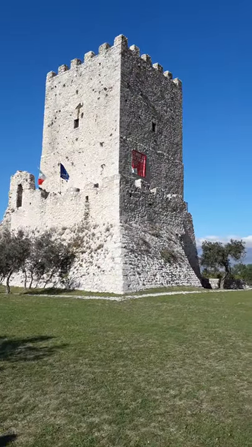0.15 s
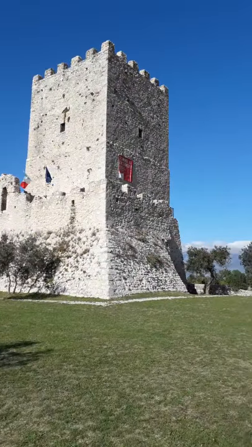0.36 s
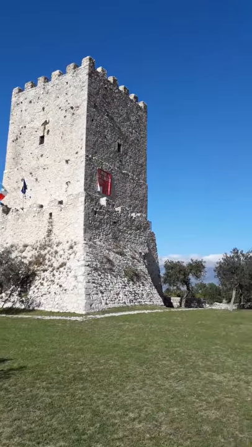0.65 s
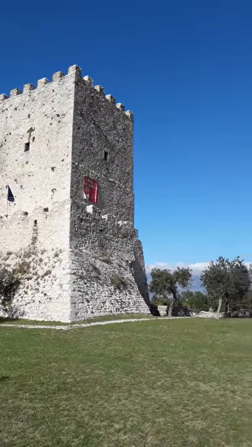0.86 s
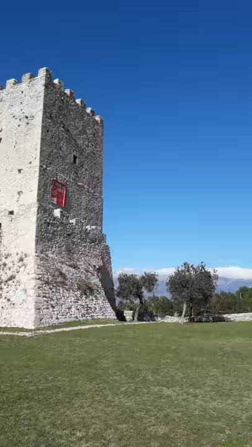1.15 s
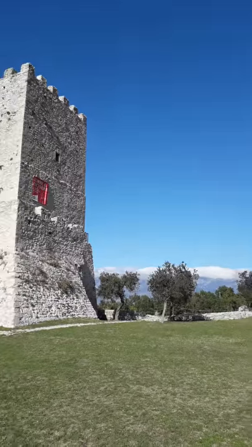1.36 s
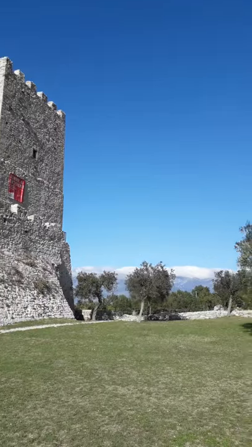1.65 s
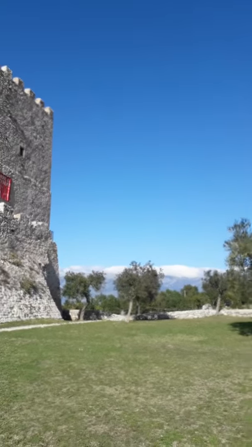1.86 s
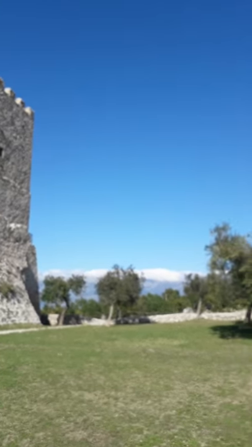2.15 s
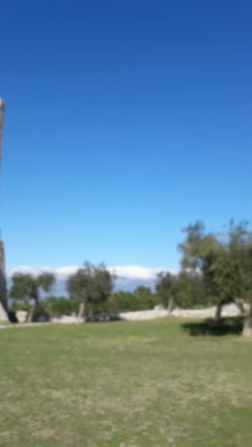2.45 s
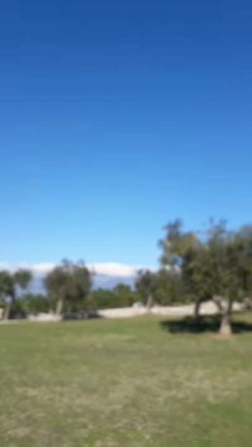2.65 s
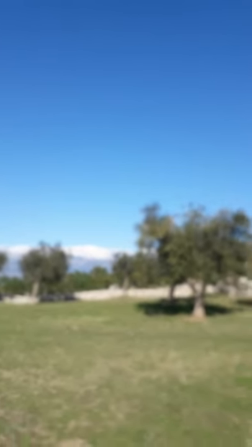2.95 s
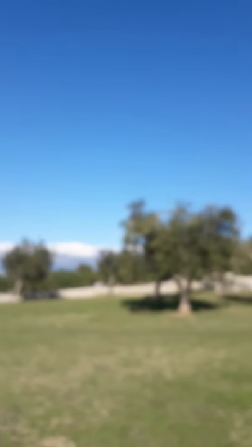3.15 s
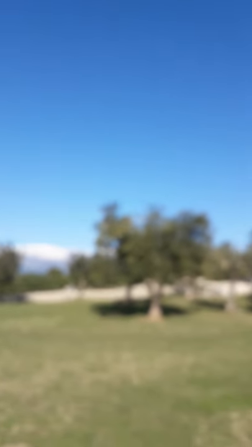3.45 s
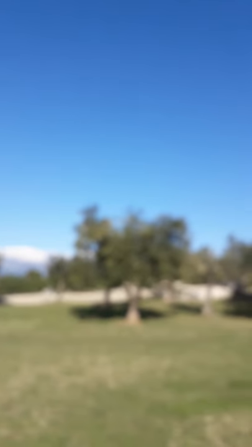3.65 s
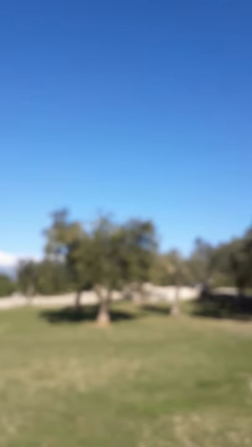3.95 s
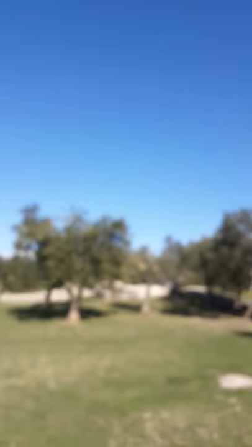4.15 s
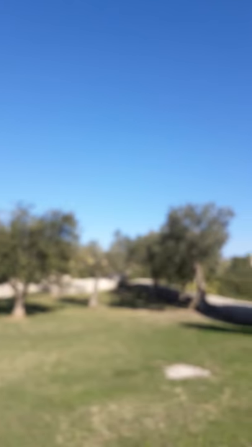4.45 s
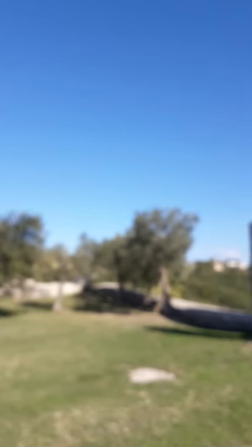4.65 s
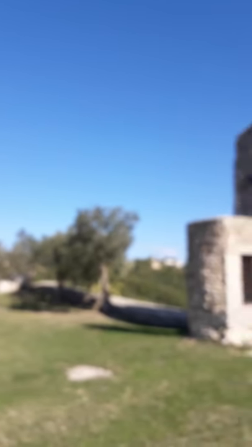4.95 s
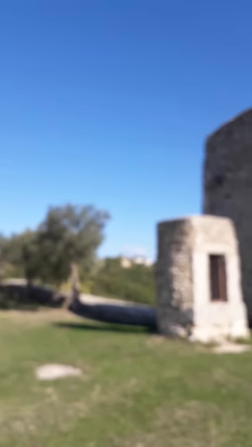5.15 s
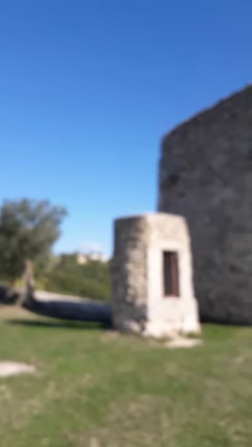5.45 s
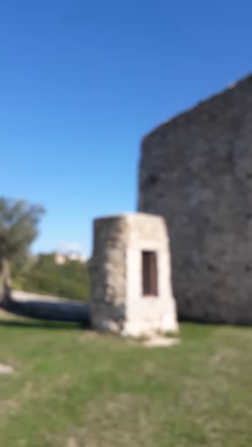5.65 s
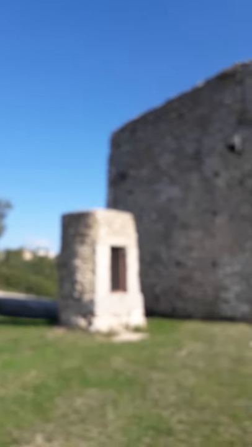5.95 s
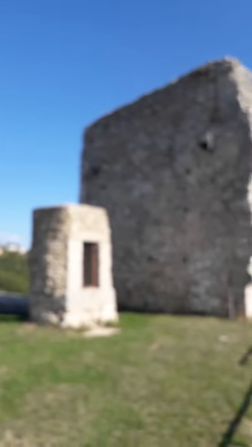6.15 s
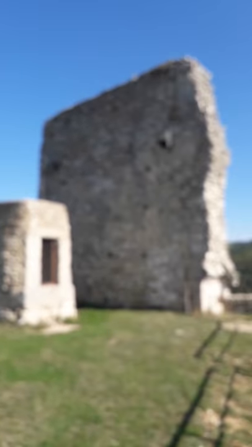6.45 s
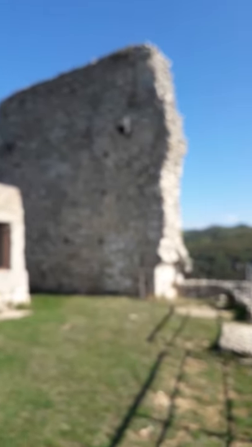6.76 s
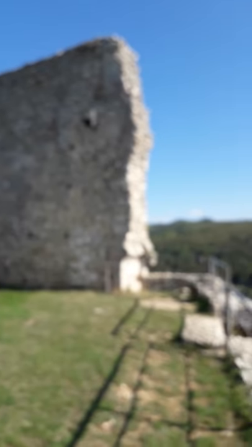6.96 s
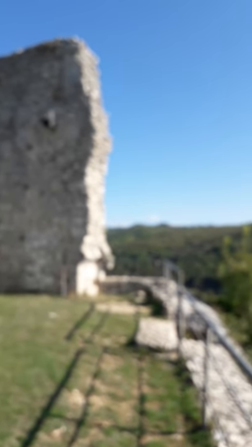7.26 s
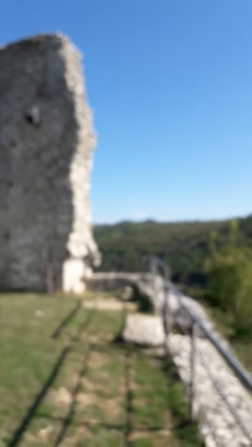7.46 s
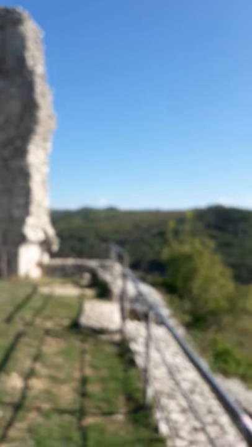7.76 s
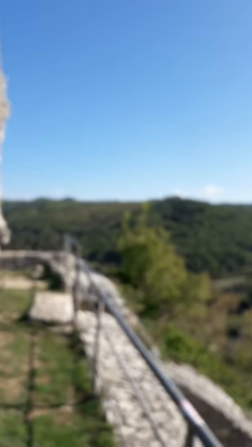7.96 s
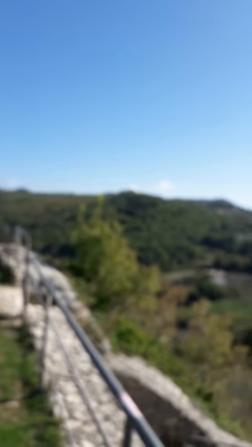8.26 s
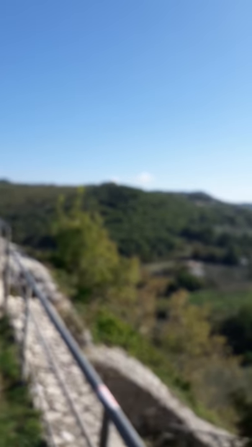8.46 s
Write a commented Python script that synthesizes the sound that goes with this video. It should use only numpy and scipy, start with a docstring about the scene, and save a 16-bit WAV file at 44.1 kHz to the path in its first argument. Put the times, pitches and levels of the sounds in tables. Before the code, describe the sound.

Close, mono wind noise outdoors, with no shelter on the microphone. Irregular buffets thud and snap over a low rumble, fall back, surge heavily near the third second, then settle into softer, muffled flutters. The last third is the roughest, with crackling gusts, hard slaps and short lulls until an abrupt loud finish. Leaves hiss faintly, and a tiny nail tick on the case is almost buried.

```python
"""Rumbling wind and hard, slapping buffets: a gusty open hilltop blows straight onto a hand-held microphone.
Breeze, buffets and gusts set the pressure and speed at which turbulent noise sweeps over the port:
rumble in the lulls, crackle in the gusts, brighter as the air speeds up, caught by a limiter.
Faintly behind, shaped noise makes the trees' hiss, the hand's brushes on the case and one nail tick."""
import sys
import numpy as np
from scipy import signal
from scipy.fft import rfft, irfft, next_fast_len
from scipy.io import wavfile
from scipy.ndimage import uniform_filter1d, minimum_filter1d, map_coordinates

SR = 44100
rng = np.random.default_rng(int(sys.argv[2]) if len(sys.argv) > 2 else 0)


def put_to_file(sound):
    """Save the sound as 16-bit audio at rate SR, in the file named by the first command-line argument."""
    columns = np.atleast_2d(sound).T  # one column per channel
    safe = np.clip(columns, -1, 1)
    whole_steps = np.round(safe * 32767)
    wavfile.write(sys.argv[1], SR, whole_steps.astype(np.int16))


N = 379701
TIME_S = np.arange(N) / SR
JERK_DB = 2.5  # spread of brief jerks in air speed


def undb(db):
    """Decibels to amplitude gain."""
    return 10 ** (np.asarray(db) / 20)


def curve(rows):
    """Rows of (time_s, value) joined by straight lines."""
    return np.interp(TIME_S, *np.transpose(rows))


def bell(mid_s, length_s, lean=0.4026):
    """Swell of power, length_s and mid_s taken at half height; rises faster than it falls."""
    u = 2 * (TIME_S - mid_s) / length_s + lean
    side_width = 1 + lean * np.sign(u)
    return np.exp2(-np.minimum((u / side_width) ** 2, 100))


def noise(spectrum, size=N):
    """Gaussian noise of rms 1, spectrum rows (freq_hz, level_db) joined on a log-frequency axis."""
    freq_hz, level_db = np.transpose(spectrum)
    n = next_fast_len(size)
    bins_hz = np.maximum(np.arange(n // 2 + 1) * SR / n, 1)
    gain = undb(np.interp(np.log(bins_hz), np.log(freq_hz), level_db))
    x = irfft(rfft(rng.standard_normal(n)) * gain, n)[:size]
    return x / x.std()


def smooth(x, seconds):
    """Two running means of the given length."""
    size = max(int(seconds * SR), 1)
    return uniform_filter1d(uniform_filter1d(x, size), size)


def walk(seconds):
    """Random wander of spread 1: white noise smoothed over the given time."""
    x = smooth(rng.standard_normal(N), seconds)
    return x / x.std()


def highpass(x, hz, order=2):
    """Butterworth high-pass: flat above a rounded knee."""
    return signal.sosfilt(signal.butter(order, hz, "high", fs=SR, output="sos"), x)


def lowpass(hz):
    """Second-order Butterworth low-pass sections."""
    return signal.butter(2, hz, fs=SR, output="sos")


def flutter(depth_db, seconds, dip=.7):
    """Random flurries poking up out of the rumble, with shallower dips between; mean power 1."""
    flurry = undb(depth_db * np.clip(walk(seconds), -dip, 1.7))
    return flurry / np.sqrt(np.mean(flurry ** 2))


# Steady wind under the gusts, before surges and flurries: time_s, level_db
BREEZE_LEVEL = [(0, -35), (0.3, -30), (0.7, -34), (1.0, -29), (1.38, -41), (1.65, -34), (1.98, -35.5),
                (2.8, -23), (3.38, -47), (3.75, -25), (4.35, -34), (5.42, -33.5), (6.4, -22), (6.85, -24),
                (7.03, -35), (7.35, -29), (7.8, -26.5), (8.2, -33), (8.6, -21)]
# Rumble roll-off at a level of -30 dB, before flurries: time_s, rolloff_hz
BREEZE_SWEEP = [(0, 298.9), (1.1, 300.7), (2.3, 219.8), (3.8, 210.2), (4.2, 299.5), (5.3, 199.9),
                (7.6, 330.3), (8.6, 339.7)]


def breeze(surge_db=2, speed_law=.27, flurry_db=4.0, flurry_speed=.55):
    """Steady wind; harder wind is faster wind, so its rumble reaches higher."""
    level_db = curve(BREEZE_LEVEL) + surge_db * np.clip(walk(seconds=0.03468), -1.6, 1.6)
    flurry = flutter(depth_db=flurry_db, seconds=0.00746)
    power = (undb(level_db) * flurry) ** 2
    rolloff_hz = curve(BREEZE_SWEEP) * undb(level_db + 30) ** speed_law * flurry ** flurry_speed
    yield power, rolloff_hz, JERK_DB


# Single hard eddies on the port, before trims and tearing: mid_s, level_db, length_s, rolloff_hz
BUFFET_EDDIES = [(0.143, -11, 0.0054, 517.6), (0.149, -14, 0.0038, 1763), (0.222, -13, 0.005, 558),
                 (0.247, -19.5, 0.0054, 634), (0.336, -17, 0.01, 605), (0.483, -13.5, 0.0047, 426),
                 (0.555, -17, 0.0093, 603), (0.798, -16.5, 0.0079, 798.5), (0.825, -13.5, 0.017, 900),
                 (0.857, -14.5, 0.0076, 680), (0.916, -19, 0.009, 694), (0.955, -15.5, 0.0076, 514),
                 (0.988, -13.5, 0.0047, 933), (1, -9.5, 0.0073, 1061), (1.041, -21, 0.013, 626),
                 (1.106, -16.5, 0.0054, 950), (1.129, -23, 0.0077, 282.8), (1.297, -31, .024, 379.6),
                 (1.526, -28.5, 0.013, 280.4), (1.594, -24, 0.0073, 498.4), (1.622, -21.5, 0.0074, 539.8),
                 (1.642, -22.5, 0.011, 320.2), (1.682, -23, 0.01, 622.7), (1.706, -16.5, 0.0056, 536),
                 (1.745, -17, 0.0083, 480), (1.821, -21, 0.012, 429.8), (2.214, -17, .005, 598),
                 (2.261, -12.5, .018, 402.7), (2.533, -12.5, 0.012, 259.9), (2.563, -12.5, 0.0054, 439.2),
                 (2.615, -10, .013, 309.7), (2.645, -16.5, .004, 559.1), (2.732, -8, .004, 882),
                 (2.745, -6.5, .006, 779.4), (2.788, -8, 0.0039, 1402), (2.809, -9.5, 0.015, 660),
                 (2.848, -8.5, 0.017, 568.8), (2.895, -8.5, .014, 621), (2.916, -16, .011, 500.7),
                 (2.969, -12.5, 0.0099, 672.3), (3.013, -20.5, 0.015, 299.2), (3.075, -18, 0.014, 234),
                 (3.242, -26, .007, 399.2), (3.264, -18.5, 0.0071, 400), (3.511, -24, .012, 477),
                 (3.599, -20, 0.0083, 623), (3.653, -12, 0.012, 299.1), (3.733, -19, 0.0042, 953.7),
                 (3.764, -13.5, 0.0058, 481.7), (3.788, -11, 0.0029, 1452), (3.861, -12.5, 0.0089, 240.2),
                 (3.963, -13, .015, 833), (3.985, -18, 0.0069, 899.5), (4.081, -23.5, 0.004, 719.3),
                 (4.165, -23, .01, 401.7), (4.236, -23, 0.0044, 641.6), (4.261, -19.5, .004, 557.3),
                 (4.509, -18, 0.013, 380), (4.643, -17, .011, 458.7), (4.748, -20, 0.017, 267.7),
                 (5.004, -19, 0.0094, 280.3), (5.08, -17.5, .007, 381.3), (5.777, -21, 0.0099, 229.5),
                 (6.106, -13.5, 0.015, 376.3), (6.273, -5, 0.012, 528.3), (6.334, -7.5, 0.019, 785.7),
                 (6.353, -6.5, 0.0075, 2197), (6.358, -9, 0.0022, 2600), (6.399, -11, 0.0039, 1301),
                 (6.428, -17, 0.0066, 1052), (6.456, -15, 0.0056, 718), (6.554, -6.5, .023, 1595),
                 (6.636, -6.5, .01, 950.8), (6.667, -8, .02, 1108), (6.74, -7.5, .013, 1251),
                 (6.896, -9.5, 0.0061, 1665), (6.94, -15, 0.0055, 1002), (7.065, -19.5, 0.013, 766.2),
                 (7.156, -22, 0.006, 1153), (7.233, -14, 0.0061, 1344), (7.342, -12.5, 0.0054, 849.7),
                 (7.389, -6, .016, 1332), (7.417, -11, 0.017, 1297), (7.502, -15, 0.0033, 1204),
                 (7.627, -12.5, 0.0085, 653.7), (7.656, -11, 0.0051, 1100), (7.68, -15, .004, 1151),
                 (7.717, -14.5, .011, 996), (7.735, -13.5, .008, 1301), (7.764, -13, .003, 1193),
                 (7.775, -13.5, 0.0079, 1399), (7.786, -10, 0.0033, 2202), (7.797, -16, 0.0032, 2402),
                 (7.842, -14, .012, 848), (7.902, -13.5, 0.004966, 849.3), (7.918, -13.5, 0.0076, 460.3),
                 (8.013, -15, 0.0072, 362.2), (8.286, -4, .0035, 1401), (8.292, -6.5, 0.0061, 793.7),
                 (8.347, -7, 0.0097, 1450), (8.387, -10.5, 0.0049, 994.3), (8.399, -15, 0.0042, 1107),
                 (8.447, -6.5, 0.017, 1292), (8.467, -8, 0.0049, 1348), (8.522, -4.5, 0.0075, 356.8),
                 (8.576, -5.5, .003, 1492), (8.591, -5.5, 0.0053, 1891)]


def buffets(trim_db=-.5, ragged_db=2.0, core=.3, speed_db=1.0):
    """Each buffet in turn: a ragged burst, fastest at its core."""
    tear = flutter(depth_db=ragged_db, seconds=0.00294)
    for mid_s, level_db, length_s, rolloff_hz in BUFFET_EDDIES:
        shape = bell(mid_s, length_s) * tear
        power = undb(level_db + trim_db) ** 2 * shape * tear
        yield power, rolloff_hz * undb(speed_db) * shape ** core, JERK_DB


def front(u, steepness, relax=0.67):
    """Steep pressure step that relaxes at once; u is time in periods of the front frequency."""
    return np.tanh(steepness * u) * np.exp(-np.abs(u) / relax)


def slaps(slap_db=6.5, fast_hz=1000, steepness=4.83):
    """Buffets break on the port with a steep front, weaker in those slower than fast_hz."""
    total = 0
    for mid_s, level_db, _, rolloff_hz in BUFFET_EDDIES:
        gain = undb(level_db + slap_db) * min(rolloff_hz / fast_hz, 1) ** 2
        total = total + gain * front((TIME_S - mid_s) * rolloff_hz, steepness)
    return total


def swell(start_s, length_s, attack_s=.015, release_s=.012):
    """Power of a gust: builds around its start, holds for its length, dies away."""
    attack = np.clip((TIME_S - start_s) / attack_s + .5, 0, 1)
    return attack * np.exp(-np.clip((TIME_S - start_s - length_s) / release_s, 0, 50))


# Gusts that build, hold and die away, before flurries: start_s, length_s, level_db, rolloff_hz
GUST_EVENTS = [(0.236, 0.014, -20.5, 504), (0.36, 0.015, -22, 484), (0.468, 0.054, -23.5, 382.7),
               (0.767, 0.06187, -23.5, 559), (0.93, 0.05, -24.5, 562.9), (1.778, 0.015, -21.5, 328.8),
               (2.159, 0.082, -18, 459.3), (2.399, 0.044, -21, 190.9), (2.519, 0.12, -22, 259.4),
               (2.701, 0.031, -12.5, 410.8), (2.757, 0.079, -16, 339.5), (3.581, 0.034, -20.5, 410.4),
               (4.485, 0.04, -20.5, 270.2), (4.614, 0.0503, -20, 329.8), (4.825, 0.051, -23.5, 370),
               (5.039, 0.041, -22, 351), (5.237, 0.025, -18.5, 221.7), (5.553, 0.034, -21, 230.4),
               (5.817, 0.038, -21, 279.2), (5.936, 0.1226, -19.5, 291.7), (6.184, 0.094, -8.5, 763),
               (6.301, 0.055, -12.5, 529.9), (6.368, .16, -19.5, 558.8), (6.679, 0.024, -19, 450.7),
               (6.757, 0.087, -18.5, 691), (6.904, 0.057, -22, 601.5), (7.121, 0.021, -23, 676.8),
               (7.268, 0.06, -21.5, 557.6), (7.427, 0.074, -18.5, 1017), (7.612, 0.0946, -21.5, 400.2),
               (7.929, 0.0606, -23.5, 380.3), (8.156, 0.015, -17, 662.8), (8.299, 0.039, -17.5, 821.7),
               (8.361, 0.15, -18.5, 380), (8.551, 0.019, -11.5, 699.6), (8.568, 0.047, -8, 1029)]


def gusts(flurry_db=3.5, flurry_speed=0.4548, roar_db=-17, roar_range_db=12):
    """Each gust in turn: flurries break it up, but above roar_db it closes towards an even roar."""
    flurry = flutter(depth_db=flurry_db, seconds=0.0059)
    for start_s, length_s, level_db, rolloff_hz in GUST_EVENTS:
        unrest = np.clip(1 - (level_db - roar_db) / roar_range_db, .4, 1)
        broken = flurry ** unrest
        power = undb(level_db) ** 2 * swell(start_s, length_s) * broken ** 2 / np.mean(broken ** 2)
        yield power, rolloff_hz * broken ** flurry_speed, JERK_DB * unrest


def crackle(pressure, rolloff_hz, per_s=110, crackle_db=3, scatter_db=7, front_hz=1300, fast_hz=800,
            steepness=4):
    """Small fronts snap at random, harder as the air speeds up to fast_hz."""
    hits = rng.random(N) < per_s / SR
    signs = rng.choice([-1, 1], N)
    scatter = undb(scatter_db * (.5 - rng.exponential(size=N)))
    snaps = hits * signs * scatter
    snaps = snaps * pressure * undb(crackle_db) * np.minimum(rolloff_hz / fast_hz, 1) ** 2
    return signal.fftconvolve(snaps, front(np.arange(-2, 2, front_hz / SR), steepness), mode="same")


def airflow():
    """Pressure, roll-off and jerkiness at the port: powers add and weight the other two."""
    power_sum = hz_sum = jerk_sum = 0
    for flows in (breeze(), gusts(), buffets()):
        for power, rolloff_hz, jerk_db in flows:
            power_sum = power_sum + power
            hz_sum = hz_sum + power * rolloff_hz
            jerk_sum = jerk_sum + power * jerk_db
    return np.sqrt(power_sum), hz_sum / power_sum, jerk_sum / power_sum


EDDY_HZ = 1000  # roll-off of the eddy pattern at unit speed
# Turbulent pressure at unit speed, the smallest eddies lost to friction: freq_hz, level_db
EDDY_SPECTRUM = [(40, 2.5), (110, -1), (200, 2.5), (500, -1.5), (1000, -9.5), (2000, -24), (3000, -48),
                 (8000, -105)]


def wind(speed_db=-0.27, port_hz=90, port_top_hz=4200, evenness=1.0, overload_db=3):
    """A frozen pattern of eddies is carried over the port at the changing speed of the air."""
    pressure, rolloff_hz, jerk_db = airflow()
    # jerks squeeze the pattern into steep fronts
    jerks = jerk_db * np.minimum(walk(seconds=.001), 1.6)
    speed = rolloff_hz / EDDY_HZ * undb(speed_db + jerks)
    eddies = map_coordinates(noise(EDDY_SPECTRUM), [np.cumsum(speed)], order=3, mode="wrap")
    # even out chance swells so that strength follows the wind
    strength = smooth(highpass(eddies, port_hz, order=3) ** 2, seconds=0.023) + 1e-9
    eddies = eddies / strength ** (evenness / 2)
    rumble = pressure * eddies / highpass(eddies, port_hz, order=3).std()
    push = rumble + slaps() + crackle(pressure, rolloff_hz)
    # hard pushes overload the capsule, which is deaf to the slowest pressure changes
    limit = undb(overload_db)
    heard = highpass(limit * np.tanh(push / limit), port_hz, order=3)
    # eddies smaller than the port cancel across it
    return signal.sosfilt(lowpass(port_top_hz), heard)


# Wind in the trees, before leaves_db and rustle: time_s, level_db
TREE_LEVEL = [(0, -61.5), (1.9, -61), (2.7, -54.5), (3.4, -61.5), (5.05, -58.5), (5.4, -55), (6.2, -53),
              (6.7, -60), (8.05, -66), (8.6, -65)]
# Relative spectrum of the hiss: freq_hz, level_db
LEAF_SPECTRUM = [(300, 14.5), (1500, 7.5), (2200, 0.5), (3000, 0.5), (4000, -2.5), (5000, -5.5),
                 (7000, -12.5), (9600, -16.5), (11000, -11), (13000, -15), (15500, -32.5)]
# Short echo, probably off the case, as the microphone turns away: time_s, echo_share
ECHO_SHARE = [(3.6, 0), (5.3, .29)]


def trees(leaves_db=6.5, rustle_db=0.8, notch_hz=2110, echo_hz=5500):
    """Countless distant leaves merge into a hiss; a short dull echo, subtracted, hollows it."""
    hiss = noise(LEAF_SPECTRUM)
    dull = signal.sosfiltfilt(lowpass(echo_hz), hiss)
    echo = map_coordinates(dull, [np.arange(N) - SR / notch_hz], order=1, mode="wrap")
    hiss = hiss - curve(ECHO_SHARE) * echo
    return hiss * undb(curve(TREE_LEVEL) + leaves_db + rustle_db * walk(seconds=0.031))


# Hand brushing the case, before grain: mid_s, level_db, length_s
BRUSH_EVENTS = [(2.955, -65.5, 0.098), (4.138, -72, 0.049), (6.385, -66, 0.059)]
# Fingernail tick on the case: start_s, level_db, decay_s
NAIL_TICK = (7.877, -24, 0.00053)
# Relative spectrum the case passes to the microphone: freq_hz, level_db
CASE_SPECTRUM = [(2500, -20), (3800, 6.5), (5000, -15.5), (8000, -5), (9300, -8), (11000, -1.5),
                 (15500, -10)]


def hand(grain_db=2.5):
    """Skin rubs the case in uneven slips and a nail ticks on it: both shape case-filtered noise."""
    rub_power = sum(undb(level_db) ** 2 * bell(mid_s, length_s) for mid_s, level_db, length_s in BRUSH_EVENTS)
    rub = np.sqrt(rub_power) * undb(grain_db * (walk(seconds=0.0036) + 2.0))
    start_s, level_db, decay_s = NAIL_TICK
    tick = undb(level_db) * (TIME_S >= start_s) * np.exp(-np.abs(TIME_S - start_s) / decay_s)
    return noise(CASE_SPECTRUM) * (rub + tick)


def scene():
    """Wind on the port over the quiet hilltop, one channel."""
    return (wind() + trees() + hand())[None]


def record(dry, hold_s=.002, top_hz=15800):
    """A fast look-ahead limiter holds peaks near full scale; a steep low-pass cuts the top."""
    gain = minimum_filter1d(1 / np.maximum(np.abs(dry[0]), 1), 2 * int(hold_s * SR))
    limited = dry * smooth(gain, hold_s)
    return signal.sosfilt(signal.ellip(8, .2, 80, top_hz, fs=SR, output="sos"), limited)


dry = scene()
out = record(dry)
put_to_file(out)
```